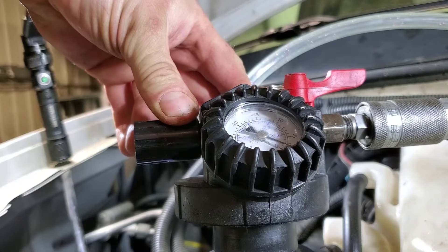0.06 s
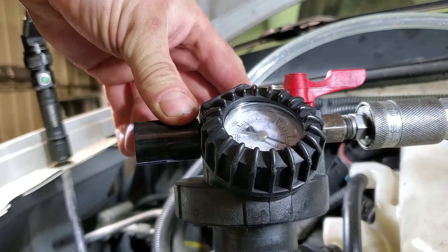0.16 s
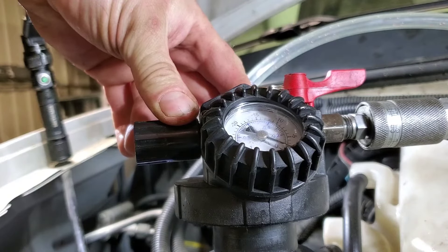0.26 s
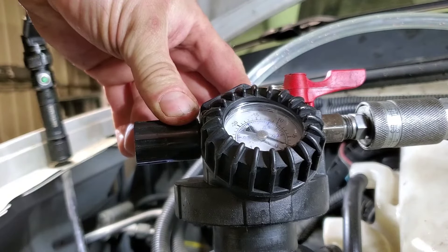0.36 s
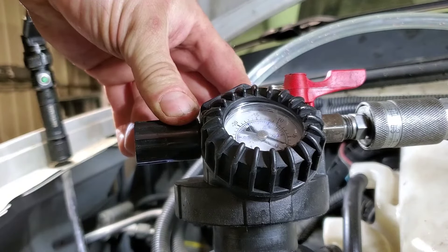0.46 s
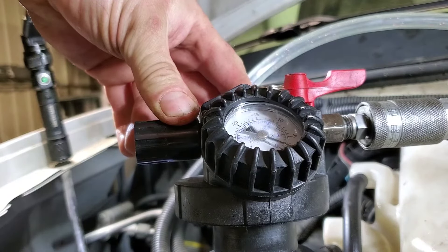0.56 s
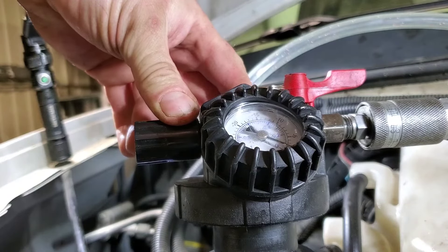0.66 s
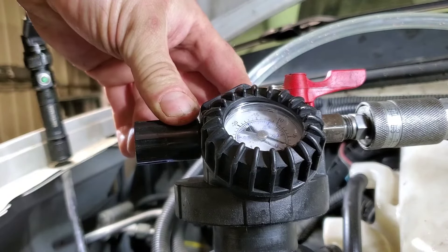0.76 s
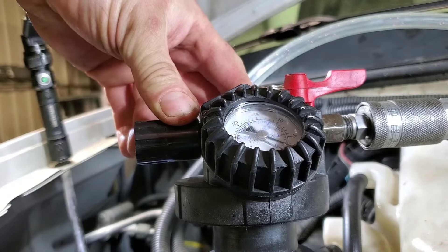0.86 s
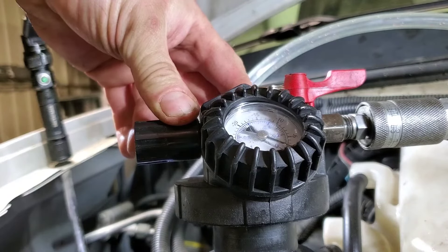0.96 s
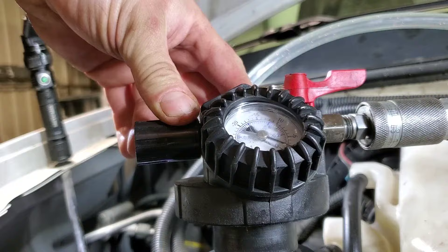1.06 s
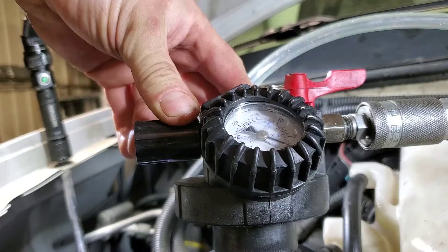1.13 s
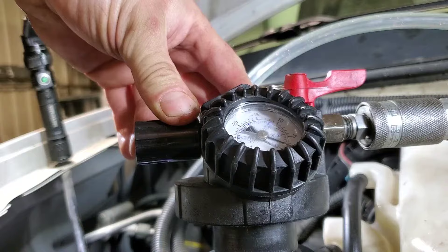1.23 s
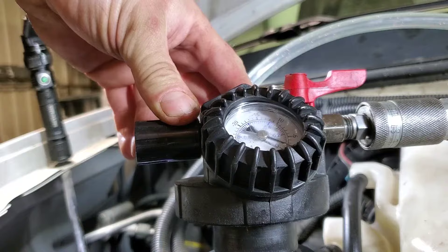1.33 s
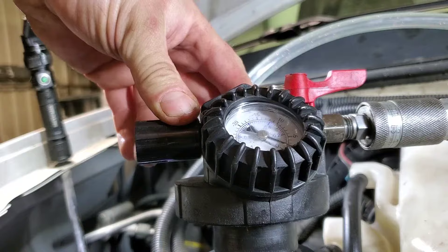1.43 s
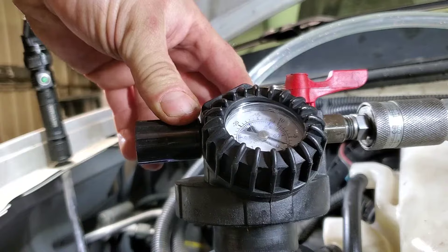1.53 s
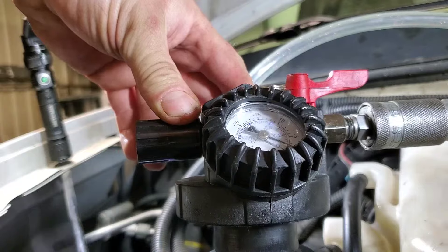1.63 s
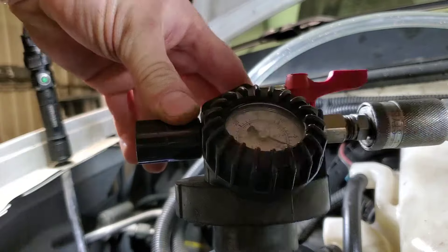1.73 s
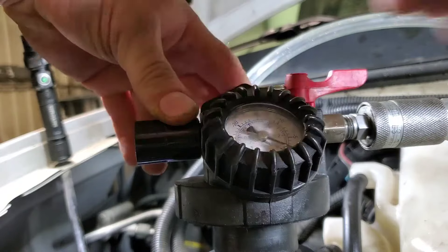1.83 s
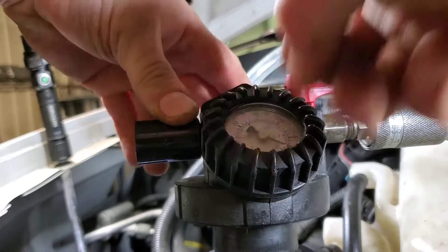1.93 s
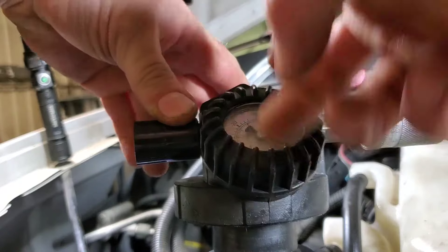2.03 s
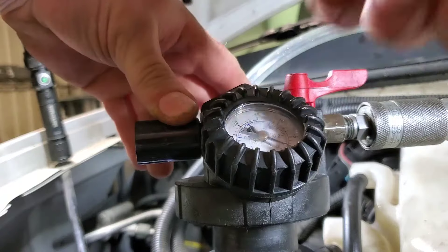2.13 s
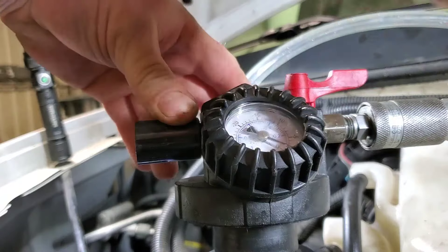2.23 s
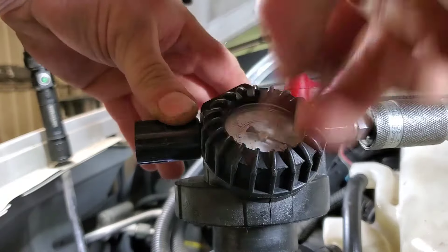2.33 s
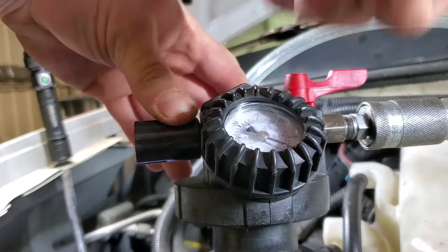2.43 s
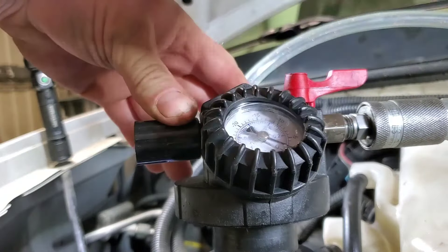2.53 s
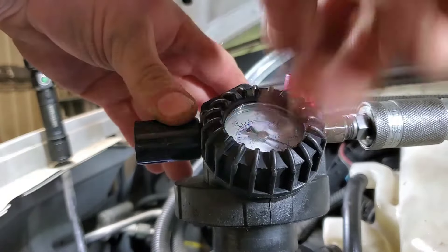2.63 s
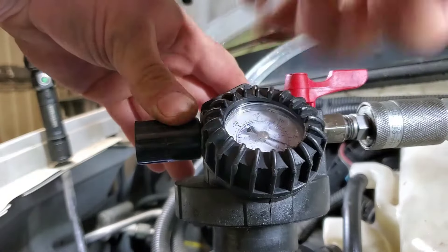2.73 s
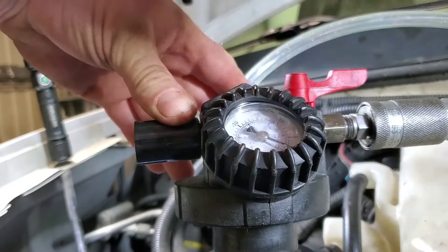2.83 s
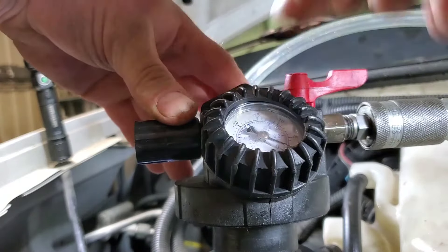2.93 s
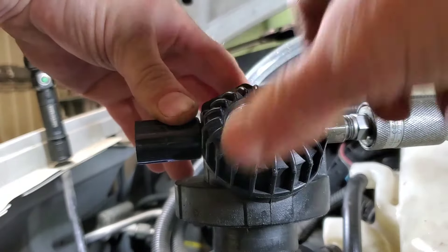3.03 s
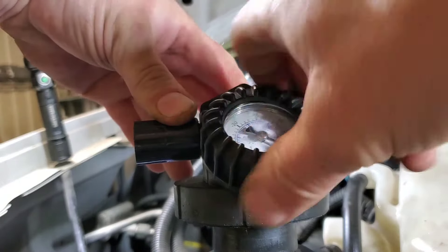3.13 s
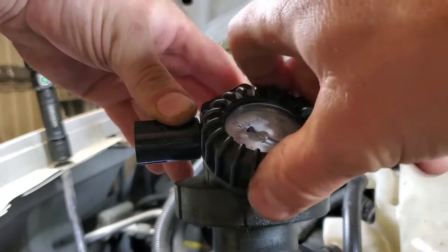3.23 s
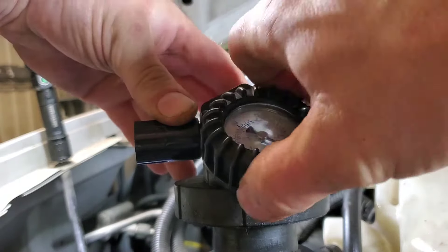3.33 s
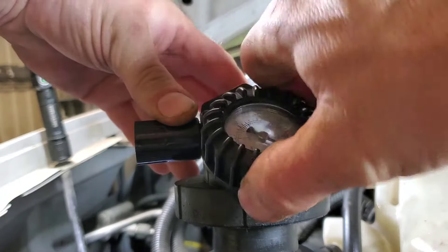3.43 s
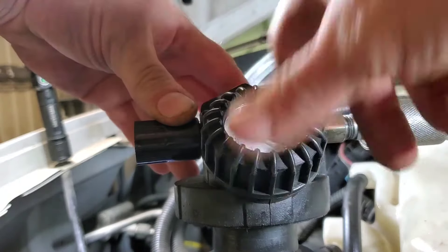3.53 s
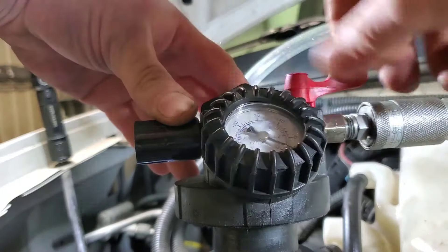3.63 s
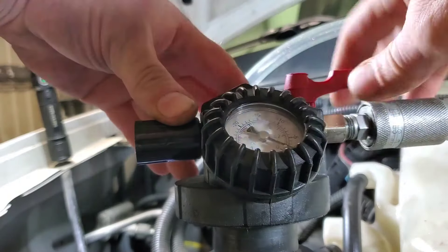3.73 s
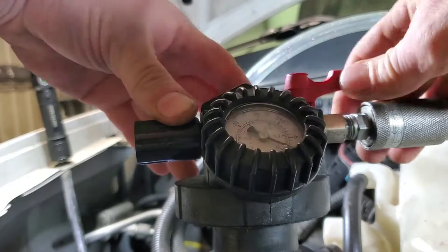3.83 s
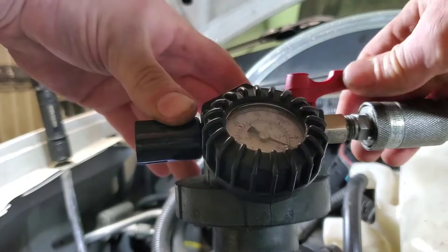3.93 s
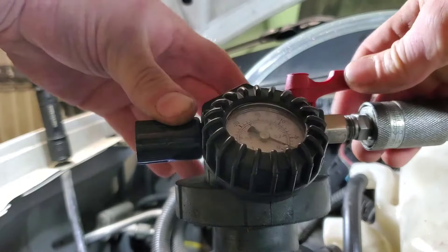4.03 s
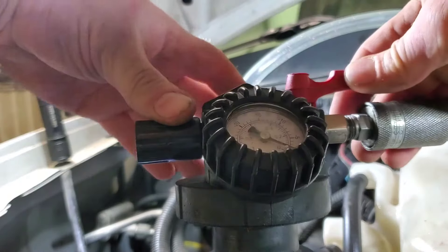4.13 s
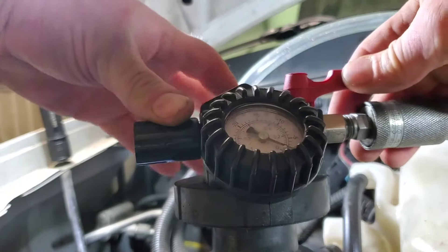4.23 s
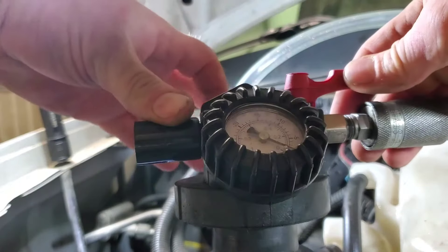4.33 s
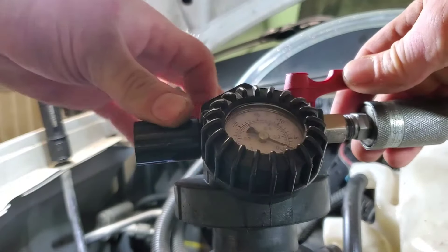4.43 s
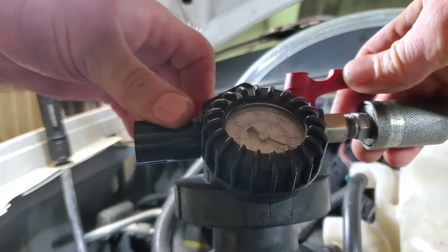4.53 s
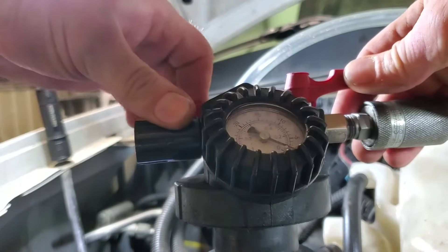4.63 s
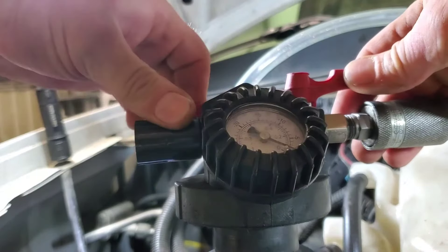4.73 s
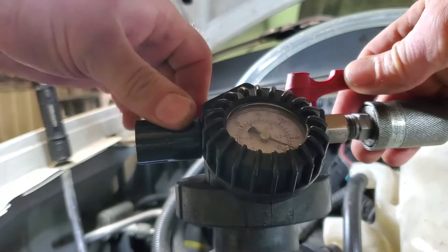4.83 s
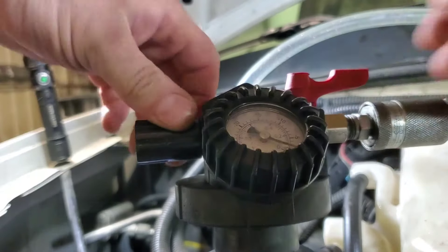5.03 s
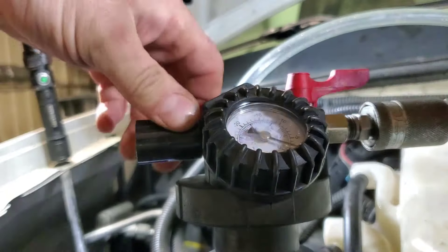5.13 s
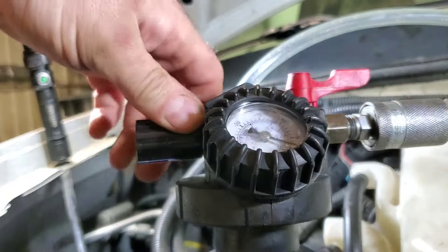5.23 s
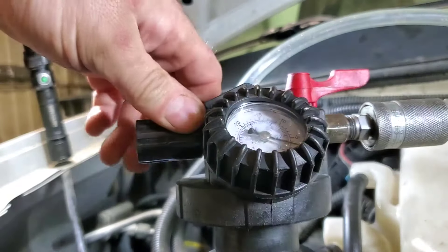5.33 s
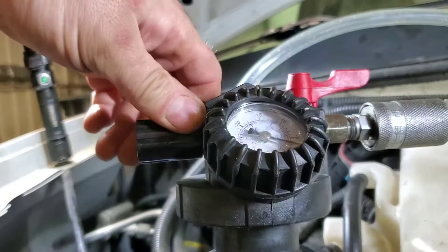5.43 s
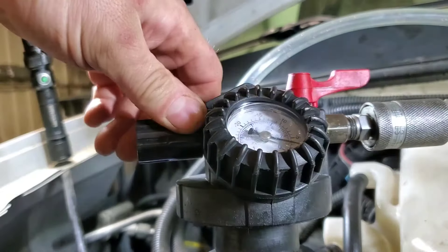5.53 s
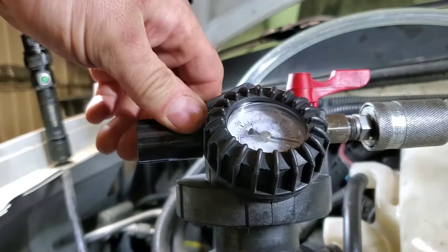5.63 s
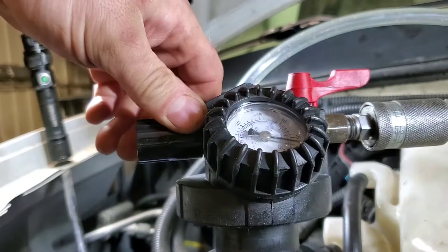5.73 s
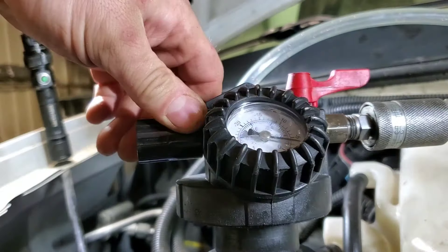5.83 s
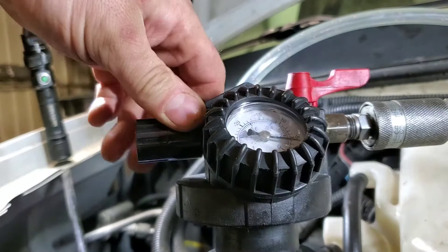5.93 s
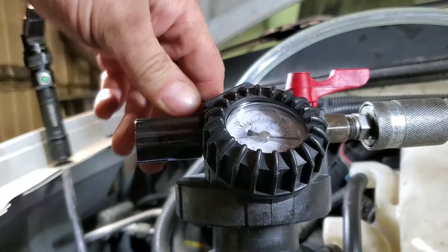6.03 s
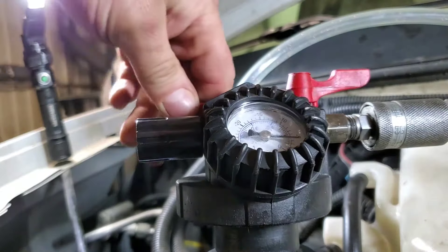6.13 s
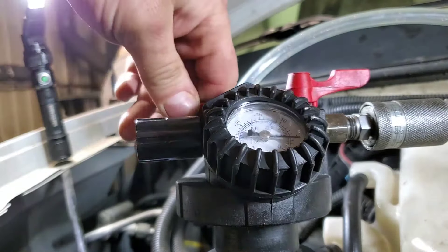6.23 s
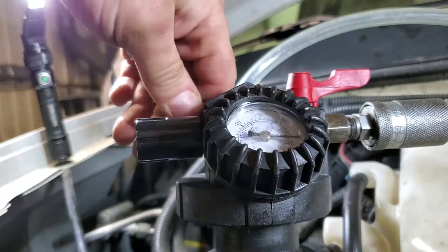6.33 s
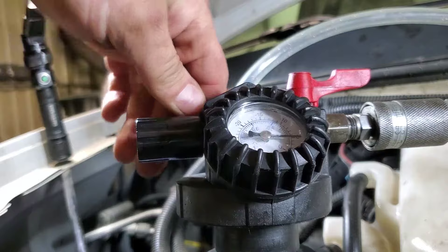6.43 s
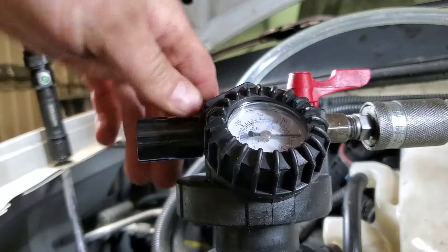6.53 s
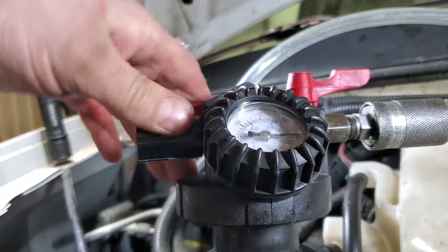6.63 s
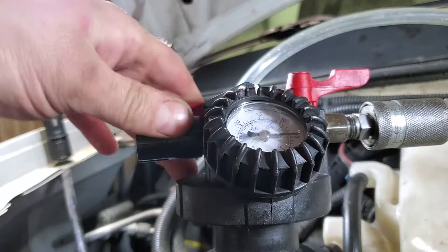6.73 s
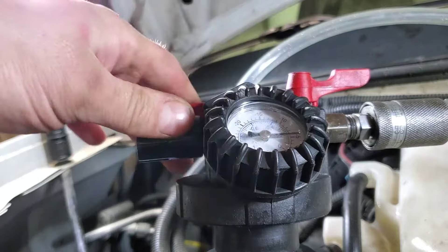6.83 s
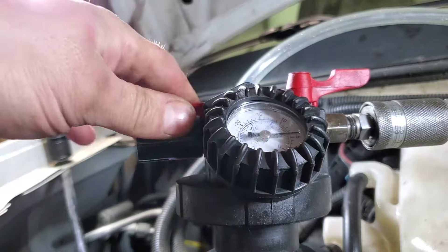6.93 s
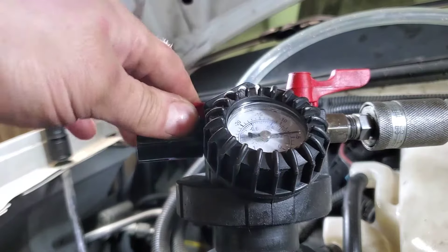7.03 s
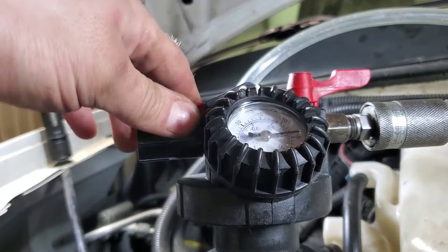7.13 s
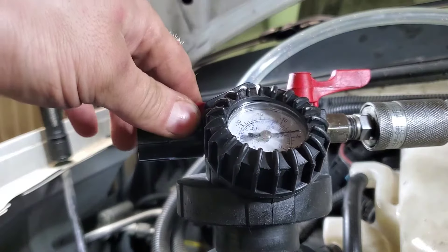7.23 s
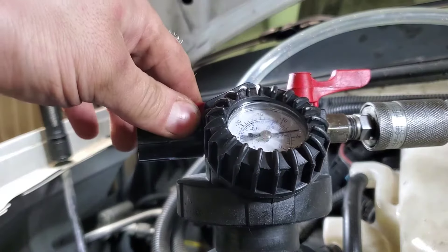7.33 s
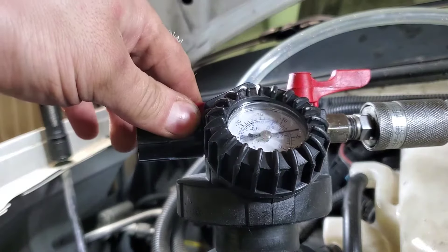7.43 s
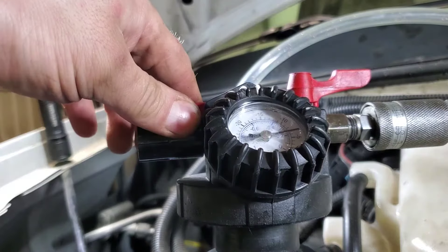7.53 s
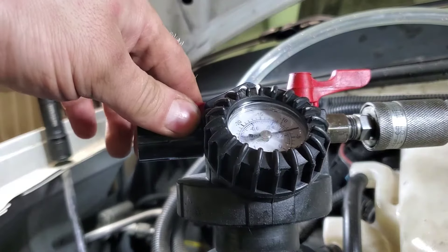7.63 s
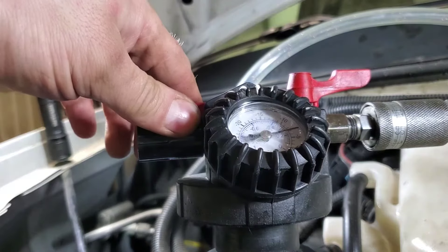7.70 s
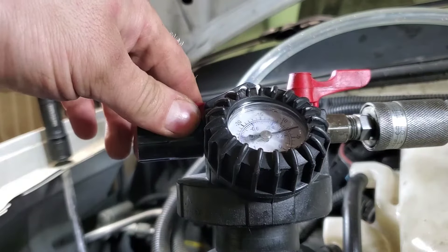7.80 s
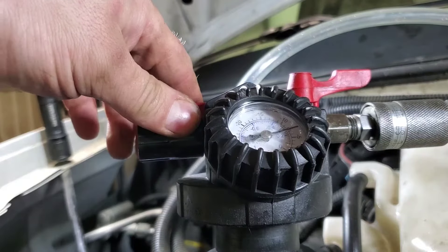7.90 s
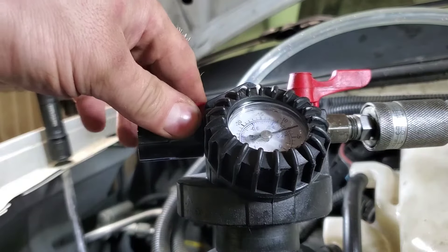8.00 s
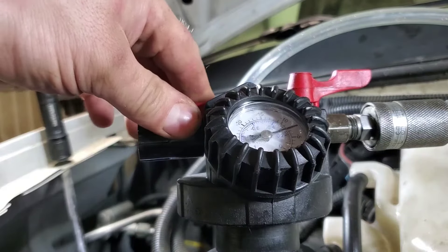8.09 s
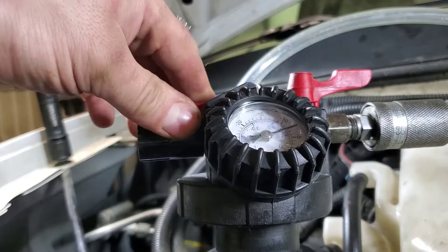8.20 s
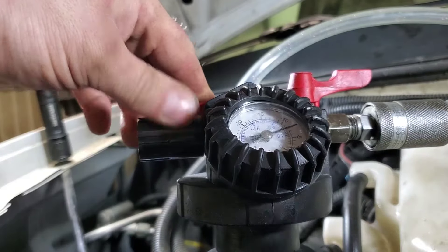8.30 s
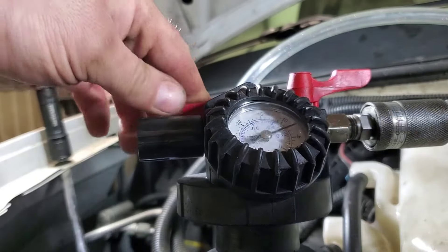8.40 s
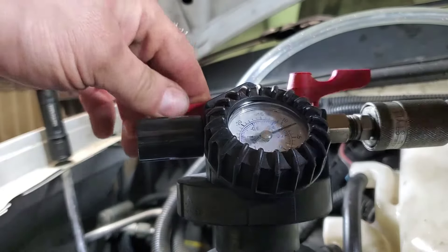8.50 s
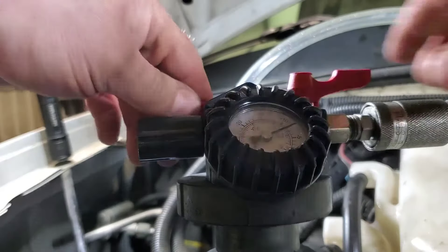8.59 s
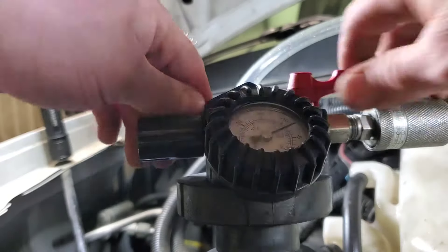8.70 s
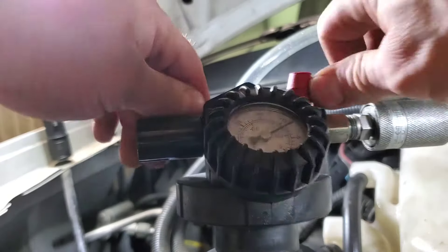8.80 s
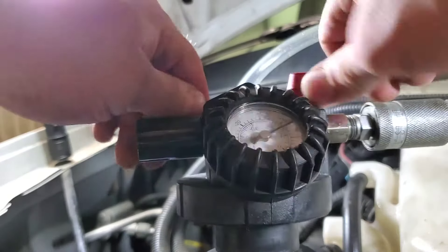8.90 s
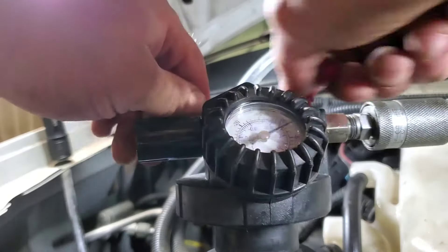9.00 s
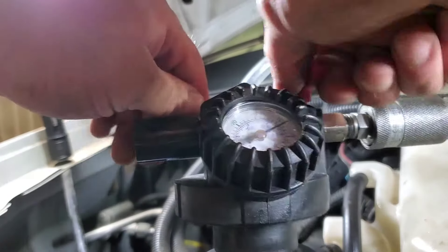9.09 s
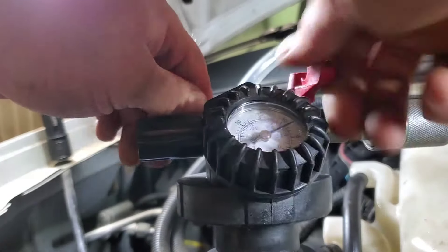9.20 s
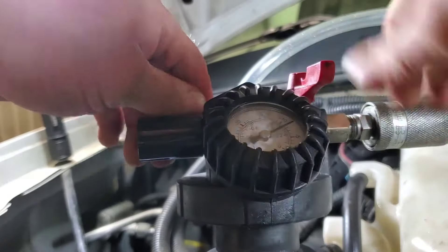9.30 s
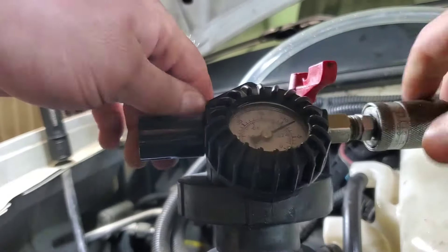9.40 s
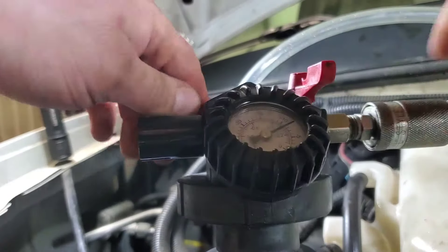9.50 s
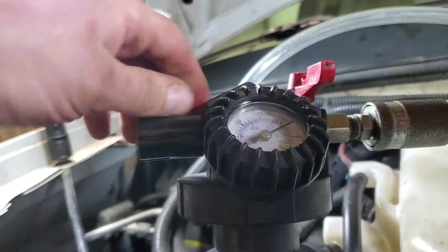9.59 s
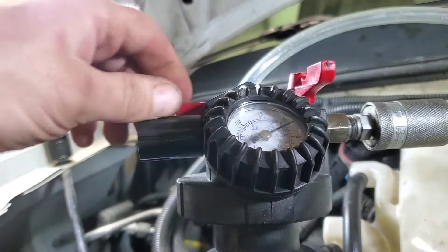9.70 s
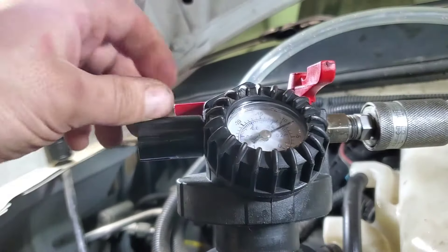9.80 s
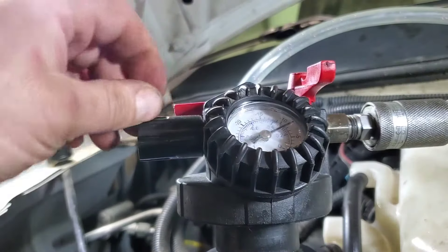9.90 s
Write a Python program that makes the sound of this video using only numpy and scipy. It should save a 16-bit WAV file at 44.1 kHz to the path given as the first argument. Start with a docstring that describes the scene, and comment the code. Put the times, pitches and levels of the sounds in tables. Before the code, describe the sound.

A dense, sharp air jet blows nonstop in a garage, heard close up with short reflections from the engine bay. Two light plastic-metal knocks tap early in the hiss. A cupping hand gradually reshapes its tone and screens the right microphone. Just after nine seconds the air is cut, falling quickly through a dull puff and click to quiet room tone.

```python
"""A steady, loud hiss comes first: compressed air through the venturi of a coolant vacuum filler.
It is noise, coloured by the hands round the outlet, and one hand screens the right microphone.
The tool, held over an engine bay in a garage, is knocked a few times: short pushes ring its modes.
Near 9 s the ball valve is shut: the jet dies with a last puff; filtered noise leaves a thin hiss and low room sound.
Faint blips and low puffs are swelling tones; the workshop behind is low noise and wavering hum."""
import sys
import numpy as np
from scipy import signal
from scipy.fft import rfft, irfft
from scipy.io import wavfile
from scipy.ndimage import map_coordinates

SR = 44100
rng = np.random.default_rng(int(sys.argv[2]) if len(sys.argv) > 2 else 0)


def unload_audio(sound):
    """Save the sound as a 16-bit wav file, at the path given as the first command line argument."""
    columns = np.transpose(np.atleast_2d(sound))
    # keep every value between -1 and 1, then stretch to whole-number steps
    steps = np.round(np.clip(columns, -1, 1) * 32767)
    wavfile.write(sys.argv[1], SR, steps.astype(np.int16))


N = 438794
TIME = np.arange(N) / SR  # s
FRAME = 1024  # samples in each short slice that is filtered on its own

# Broad colour of the jet at the two microphones:
# (frequency [Hz], left [dB], right [dB])
JET_COLOUR = [(1190, -10, -13), (2520, 0.36, -1.2), (5390, -4.5, -7.5), (8560, 3.67, 2.3),
              (11100.0, -0.84, -2.1), (14500, 11.5, 1)]
# Peaks and dips of the nozzle, hands and nearby parts:
# (frequency [Hz], width [Hz], left [dB], right [dB], added left by the cupped hand [dB],
#  added right by the cupped hand [dB], added by the hand at the valve [dB], phase of the right side [rad])
PEAKS_AND_DIPS = [(1956, 272, -0.2, -4.5, 18.5, 2.5, 4.5, -0.57),
                  (1937, 59, 6, 12.5, -7.5, -4.5, -8.5, 1.5), (2045, 51, -8, 1.7, 0.8, 6, 0, 1.3),
                  (2192, 133, 5.5, -0.5, -12, 0, -9, -0.14), (2560, 140, 0.1, 0.5, 0.4, -8, -3, -0.36),
                  (2856, 157, 7.0, 4.5, 0.2, -3, -9.5, -0.25), (3270, 57, 1.5, 4, -3, 1.5, -2, -0.04),
                  (3745.0, 275, 5.5, 2, -0.7, 1.3, -2.5, -1.1), (4053, 98, -5, -8.3, 12, 9, 7.5, -1.7),
                  (4314, 53, -1.5, 1.5, 5, -14, -7.5, 1.8), (4408, 142, 0.3, -1, 11, 8.9, 10.5, 1.2),
                  (4845, 234, 3, -1.3, 12.5, 3, -3, 0.0), (5370, 134, 1.2, -1, 3, -4, 11.5, 0.8),
                  (6000, 332.0, 9, 4.5, 2, -2.5, 4.5, -0.65), (6380, 126, 4.9, -0.5, 2.5, -2, -5, -0.3),
                  (6705.0, 200, -3, -7.5, 15.5, -1.2, 5, 2.5), (7180, 80, 4.5, -1, 3.5, -3.1, 1.5, 1.7),
                  (7525, 88, 10, 5.5, -11, -1.9, 6, 1.5), (7708, 238, -29, -24.5, 25, 10, -3, 2.1),
                  (8005, 114, -19, -28, 1, 4.1, -3, 0.2), (9150, 120, 3, -2, 3, -1, -2.5, 0),
                  (9760, 240, 5.5, 2, 0.1, -6, -0.5, -1.5), (10600, 330, 9, 4.5, 7.5, 1.5, 1, 2.06),
                  (11440, 226, 6.5, 6.5, 4.5, -2, -1.8, 0.3), (12630, 480, -6.2, -3, 6, -0.5, 3, 2.1),
                  (12800, 86, 6, 4.5, -1.6, 2, 0, -1), (13800, 274.0, -5.5, 0, 7.5, 3, -0.5, 0.4),
                  (14660, 370, -12, -6.3, 4.5, -6, -3, 1)]
# Shutting the valve: (time [s], flow [dB], tilt above 2 kHz [dB per octave])
VALVE = [(8.93, -1.5, -0.4735), (9.054, 2, -1.7), (9.068, -2, -6.5), (9.085, -15, -6), (9.104, -7.5, -7.5),
         (9.113, -12, -7.5), (9.121, -7, -10), (9.135, -32, -4), (9.2, -76, -4.5)]
# The left hand closes round the outlet, then closes further: (time [s], cupped [0-1])
CUP = [(0.0, 0.22), (1.8, 0.09), (2.1, 0.14), (3.6, 0.0), (4.1, 0), (4.5, 0.0), (4.72, 0.45), (5.3, 0.47),
       (6.1, 0.6), (6.5, 0.82), (6.8, 0.76), (7.3, 0.98), (8.3, 0.99), (8.6, 0.8), (9.0, 0.87)]
# The gap between its fingers makes one gliding peak or dip: (time [s], frequency [Hz], height [dB])
FINGER_GAP = [(0.0, 3230, 5.3), (2.0, 3260, 3.5), (3.4, 3240, 3.5), (4.4, 2983.0, 5.5), (4.9, 3270, 3.5),
              (5.8, 3660, 8), (6.5, 3401.0, 7), (6.8, 3820, -1), (7.1, 4573.0, -7), (7.5, 4600, -3.5),
              (7.9, 4320, -2.5), (8.3, 4170, -4), (8.56, 3597.0, 8), (9.0, 3820, -0.2)]
# The reflection off the palm makes a higher one: (time [s], frequency [Hz], height [dB])
PALM_ECHO = [(0.0, 4200, -5.4), (1.8, 4150, -6.5), (2.4, 4750, 0), (2.7, 4887.0, -8), (3.6, 4500, -1.1),
             (4.45, 4897.0, -5), (4.7, 4800, 3), (5.2, 5100, -0.5), (5.6, 4700.0, -5), (6.2, 4675.0, 0.48),
             (6.6, 4500, -1), (6.9, 4460, -3.5), (7.2, 5870, 4), (7.8, 5781.0, 2.5), (8.3, 5100, -1.9),
             (8.55, 5220.0, 7), (9.0, 5400, -5)]
# A narrow dip, now and then a peak, wanders below them as the grip changes:
# (time [s], frequency [Hz], height [dB])
GRIP_DIP = [(0.0, 2034.0, -2.9), (2.2, 2106.0, -1.5), (3.6, 2000, -2.8), (4.4, 2090, -2.5),
            (4.9, 2304.0, -8), (5.3, 2561.0, -5.5), (6.0, 2560, -9), (6.4, 2870, 3), (6.7, 3072.0, -3.5),
            (7.0, 3268.0, 5), (8.2, 2900, -5), (8.65, 2281.0, -5), (9.0, 2838.0, -7)]
# A hand comes near the tool and draws back: (time of the turn [s], half-length [s], nearness [0-1])
REACHES = [(1.859, 0.079, 0.4), (2.107, 0.08, 0.0), (2.98, 0.098, 0.53), (4.37, 0.5, 0.87),
           (6.704, 0.076, 0.7), (8.688, 0.19, 0.605)]
# A hand moves in front of the right microphone, stays and lifts a little: (time [s], level [dB])
HAND_SCREEN = [(6.14, -0.5), (6.21, -9), (8.65, -9.5), (8.97, -6.5)]
# A finger shifts at the outlet and shades or bares the jet:
# (time at the middle [s], half-length [s], level [dB])
FINGER_SHIFTS = [(2.11, .06, 0.5), (3.5, .3, .5), (5.755, 0.58, -0.8), (6.687, .035, 1),
                 (7.075, .061, -1.3), (8.04, .062, 1.5), (8.61, .038, -2.5), (8.777, .029, 1.3)]
# Thin hiss left after the valve is shut, with some low sound of the room:
# (frequency [Hz], left [dB per Hz], right [dB per Hz])
LEFTOVER_HISS = [(150, -105, -105), (280, -85, -87), (480, -93, -101), (750, -94, -102), (1100, -96, -107),
                 (1500, -106, -118), (2400, -98, -113), (3200, -89, -104), (5300, -91, -107),
                 (6350, -86, -103), (7600, -99, -110), (8600, -92, -101), (10200, -91, -94),
                 (11000, -85, -94), (12400, -88, -90), (14500, -89, -98)]
# Knocks on the tool, before reflections and balance:
# (time [s], peak [dB], rattle half-length [s], centre of its modes [Hz], spread [octaves], fall by 60 dB [s])
KNOCKS = [(2.443, -27.5, 0.011, 430, 0.83, 0.042), (2.775, -21.5, .002, 1500, 1, .025),
          (2.783, -32, 0.0086, 380, 0.7, .035), (8.555, -47, .004, 170, 0.36, .06),
          (9.119, -26, 0.0012, 2600, 3, 0.0073)]
# What the tool rings with: (frequency [Hz], relative level [dB])
TOOL_MODES = [(180, -8), (323, 8), (455, 3.5), (641, 3), (740, -1), (980, -20), (1265, 6.5), (1453, 1),
              (1900, -6), (2450, -7), (3200, -7), (4100, -8)]
# Faint hollow blips under the hiss: (time [s], frequency [Hz], peak on the left [dB])
BLIPS = [(0.718, 905, -49), (0.765, 830, -51), (0.822, 800, -50), (1.828, 820, -46), (2.503, 790, -48),
         (4.15, 783, -49), (4.342, 810, -44), (4.576, 780, -50), (4.932, 923, -50), (5.236, 830, -48),
         (5.41, 760, -51), (7.456, 830, -58), (8.54, 457, -45), (8.543, 737, -46), (8.566, 974, -46),
         (8.567, 1163, -48), (8.99, 834, -54), (9.066, 810, -50)]
# Low puffs, before random scatter: (time [s], peak [dB])
PUFF_LEVEL = [(0, -49.5), (6.1, -52.5), (6.3, -58.5), (9, -57)]
# Low rumble of the workshop, before its gaps; the balance also moves the hum:
# (time [s], level [dB], left minus right [dB])
RUMBLE_LEVEL = [(0, -49.5, -3), (2.0, -49, -2), (2.7, -53.5, -6), (6.1, -52, -4.5), (6.3, -64.5, -13),
                (8.8, -64.5, -13), (9.15, -54, 3), (9.95, -57, 3)]
# Colour of the rumble: (frequency [Hz], relative level [dB])
RUMBLE_COLOUR = [(20, -45), (40, -18), (60, -4), (95, 10), (130, 7), (175, 4.5), (225, -4.5), (290, -8),
                 (340, -40), (420, -48), (1000, -35)]
# Hum of workshop machines, before wavering, gaps and balance: (frequency [Hz], level [dB])
HUM = [(59.5, -74), (118.6, -65.5), (172.3, -67.5), (258.4, -63)]
# How rarely the low sounds come through between gaps: (frequency [Hz], threshold [spreads of the chance])
LUMPS = [(50, .1), (120, -0.56), (190, .1), (260, 1.87), (350, 2.5), (450, 0)]


def jet(level_db=-57.5, surge_db=0.88, flutter_db=0.75, lowest_hz=1270, drift_db=2.54, treble_drift_db=2.34):
    """Turbulent air from the nozzle; it grows weak and dull as the valve takes the pressure away."""
    flow_db, _ = curves(VALVE, TIME)
    air = turbulence(shared=0.67)
    air = air * undb(level_db + flow_db + surge_db * walk(14) + flutter_db * walk(150))
    air = surroundings(air, bay_db=-15, bay_t60=0.057, garage_db=-20, garage_t60=0.56)

    overlap = FRAME - FRAME // 4
    hz, s, frames = signal.stft(air, SR, nperseg=FRAME, noverlap=overlap)
    _, tilt = curves(VALVE, s)
    octaves_above_2k = np.log2(np.maximum(hz / 2000, 1))
    # the colour of the hiss wanders at random over frequency and time
    depth_db = np.interp(hz, [5000, 9000], [drift_db, treble_drift_db])[:, None]
    wander_db = depth_db * drift(hz, s, spacing_hz=95, rate=4.5)
    shade = undb(np.outer(octaves_above_2k, tilt) + wander_db)
    frames = frames * outlet_colour(hz, s) * shade
    sound = signal.istft(frames, SR, nperseg=FRAME, noverlap=overlap)[1][:, :N]

    # the hiss is thin: almost nothing is heard below about 1.3 kHz
    low_cut = signal.cheby1(12, 0.5, lowest_hz, "high", fs=SR, output="sos")
    return signal.sosfilt(low_cut, sound)


def turbulence(shared):
    """Rushing air is noise: each microphone hears partly the same eddies and partly its own."""
    return np.sqrt(shared) * white(channels=1) + np.sqrt(1 - shared) * white()


def outlet_colour(hz, s, cup_left_db=-4.5, cup_right_db=0.5, reach_rest=0.17, port_lag_ms=0.1646):
    """Reflections past the hands lift and cut frequencies: complex gain (side, frequency, time)."""
    cup, = curves(CUP, s)
    screen_db, = curves(HAND_SCREEN, s)
    # between the reaches the nearness is reach_rest
    reach = reach_rest + sum((near - reach_rest) * bell(s, when, span) for when, span, near in REACHES)
    finger_db = sum(db * bell(s, when, span) for when, span, db in FINGER_SHIFTS)
    (centre, width, left_peak, right_peak, left_cup, right_cup,
     reach_peak, phase) = np.transpose(PEAKS_AND_DIPS)
    humps = bell(hz[:, None], centre, width)

    # the cupped palm is a small cavity; fingers and palm add gliding peaks and dips
    left_glides, right_glides = (glide(FINGER_GAP, hz, s, width_hz=313, right_share=0.15)
                                 + glide(PALM_ECHO, hz, s, width_hz=170, right_share=1.5)
                                 + glide(GRIP_DIP, hz, s, width_hz=114, right_share=1))
    left_palm = np.outer(cup_left_db + humps @ left_cup, cup) + left_glides
    right_palm = np.outer(cup_right_db + humps @ right_cup, cup) + right_glides

    both = finger_db + np.outer(humps @ reach_peak, reach)
    left_jet, right_jet = spectra(JET_COLOUR, hz)
    left = (left_jet + humps @ left_peak)[:, None] + both + left_palm
    right = (right_jet + humps @ right_peak)[:, None] + both + right_palm + screen_db
    # the outlet points left, so the right microphone hears it later
    turn = humps @ phase - 2 * np.pi * hz * port_lag_ms / 1000
    return np.array([undb(left), undb(right) * np.exp(1j * turn)[:, None]])


def glide(table, hz, s, width_hz, right_share):
    """A peak or dip that moves with the hand: dB (side, frequency, time)."""
    centre_hz, db = curves(table, s)
    hump = db * bell(hz[:, None], centre_hz, width_hz)
    return np.array([hump, right_share * hump])


def leftover_hiss(start_s=9.06, rise_s=0.016):
    """Thin hiss left after the valve is shut, with some low sound of the room: noise through a spectrum."""
    air = surroundings(turbulence(shared=0.35), bay_db=-5.5, bay_t60=0.031, garage_db=-6, garage_t60=0.65)
    fade_in = np.clip((TIME - start_s) / rise_s, 0, 1)
    return coloured(air, LEFTOVER_HISS) * fade_in


def knocks(rattle=0.068, left_db=2):
    """The loose tool rubs in the filler neck and strikes; where it strikes decides which modes ring most."""
    out, t = np.zeros(N), TIME[:SR // 4]
    hz, mode_db = np.transpose(TOOL_MODES)
    modes = undb(mode_db)[:, None] * np.cos(2 * np.pi * np.outer(hz, t))
    lead = SR // 20  # room for the rattle that comes before the strike
    for s, db, rattle_s, centre_hz, octaves, t60 in KNOCKS:
        push = rattle * rng.standard_normal(len(t)) * bell(t, t[lead], rattle_s)
        push[lead] += 1  # the strike itself
        mode_share = bell(np.log2(hz / centre_hz), 0, octaves)
        ring = mode_share @ modes * decay(t, t60)
        knock = signal.fftconvolve(push, ring)[:len(t)]
        start = int(s * SR) - lead
        out[start:start + len(t)] += undb(db) * knock / np.abs(knock).max()
    heard = surroundings(out, bay_db=0.5, bay_t60=0.033, garage_db=-35, garage_t60=0.21)
    return heard * undb([[left_db], [0]])


def blips(half_length_s=0.01, right_db=-5):
    """Faint hollow tones that swell and vanish under the hiss."""
    tones = sum(undb(db) * bell(TIME, s, half_length_s) * np.sin(2 * np.pi * hz * TIME)
                for s, hz, db in BLIPS)
    return tones * undb([[0], [right_db]])


def burble(count=46, low_hz=205, high_hz=290, half_length_s=0.011, scatter_db=3):
    """Soft low puffs, short swelling tones at random moments while the air is blowing."""
    out = np.zeros(N)
    last_s = PUFF_LEVEL[-1][0]
    for when, pitch, size in rng.random((count, 3)):
        s = when * last_s
        hz = low_hz + pitch * (high_hz - low_hz)
        level_db, = curves(PUFF_LEVEL, s)
        puff_db = level_db + scatter_db * (2 * size - 1.5)
        near = np.abs(TIME - s) < 0.1
        t = TIME[near]
        out[near] += undb(puff_db) * bell(t, s, half_length_s) * np.sin(2 * np.pi * hz * t)
    return out


def workshop(side=0.84, waver_db=1, waver_rad=0.32, gap_db=55):
    """A diffuse low rumble and wavering machine hum; both come in uneven lumps while the air is blowing."""
    mid, apart = coloured(white(), RUMBLE_COLOUR)
    level_db, balance_db = curves(RUMBLE_LEVEL, TIME)
    sides = np.array([[1], [-1]])
    rumble = undb(level_db) * (mid + side * sides * apart) / mid.std()
    hum = np.zeros(N)
    for tone_hz, db in HUM:
        loudness = np.sqrt(2) * undb(db + waver_db * walk(2.41))
        hum += loudness * np.sin(2 * np.pi * tone_hz * TIME + waver_rad * walk(7.7))

    hz, s, frames = signal.stft(rumble + hum, SR, nperseg=FRAME)
    flow_db, _ = curves(VALVE, s)
    # the gaps between the lumps are most frequent at the upper edge of the rumble
    threshold, = curves(LUMPS, hz)
    gaps = np.clip(drift(hz, s, spacing_hz=80, rate=19) - threshold[:, None], -2, 0)
    # the gaps fill up as the flow dies
    frames = frames * undb(gap_db * gaps * undb(flow_db))
    low = signal.istft(frames, SR, nperseg=FRAME)[1][:, :N]
    return low * undb(sides * balance_db / 2)


def surroundings(x, bay_db, bay_t60, garage_db, garage_t60):
    """Direct sound, dense quick engine-bay reflections and a garage tail, at two microphones."""
    t = TIME[:SR // 2]
    response = np.zeros((2, len(t)))
    response[:, 0] = 1  # direct sound
    for db, t60 in ((bay_db, bay_t60), (garage_db, garage_t60)):
        tail = rng.standard_normal(response.shape) * decay(t, t60) * (t > 0.003)
        response += undb(db) * tail / np.linalg.norm(tail, axis=1, keepdims=True)
    response /= np.linalg.norm(response, axis=1, keepdims=True)
    return signal.fftconvolve(np.atleast_2d(x), response, axes=1)[:, :N]


def white(channels=2):
    """White noise of 0 dB per Hz."""
    return rng.standard_normal((channels, N)) * np.sqrt(SR / 2)


def coloured(x, table):
    """Sound filtered by a spectrum."""
    gain = undb(spectra(table, np.fft.rfftfreq(N, 1 / SR)))
    return irfft(rfft(x) * gain, N)


def walk(rate):
    """Random values joined by straight lines, of spread near 1, with `rate` values a second."""
    knots = rng.standard_normal(int(rate * N / SR) + 2)
    return np.interp(TIME * rate, np.arange(len(knots)), knots)


def drift(hz, s, spacing_hz, rate):
    """Smooth chance over frequency and time, of spread near 1."""
    rows, columns = np.meshgrid(hz / spacing_hz, s * rate, indexing="ij")
    knots = rng.standard_normal((256, 256))
    return map_coordinates(knots, [rows, columns], order=2, mode="mirror")


def decay(t, t60):
    """Dying away by 60 dB in t60 seconds."""
    return np.exp(-np.log(1000) * t / t60)


def bell(x, centre, width):
    """A rounded hump of height 1."""
    return np.exp(-0.5 * ((x - centre) / width) ** 2)


def undb(db):
    """Decibels to gain."""
    return 10 ** (np.asarray(db) / 20)


def curves(table, at):
    """Each later column of a table, joined by straight lines along the first."""
    points, *columns = np.transpose(table)
    return [np.interp(at, points, column) for column in columns]


def spectra(table, hz):
    """Each dB column of a spectrum, joined on a log-frequency axis."""
    points, *columns = np.transpose(table)
    return np.array([np.interp(np.log(hz + 1), np.log(points), column) for column in columns])


def scene():
    """The jet, the thin hiss that follows it, knocks, faint blips, low puffs and the workshop."""
    return jet() + leftover_hiss() + knocks() + blips() + burble() + workshop()


def record(dry, top_hz=14500):
    """The recorder cuts the top steeply."""
    top_cut = signal.ellip(12, 0.2, 90, top_hz, fs=SR, output="sos")
    return signal.sosfilt(top_cut, dry)


dry = scene()
out = record(dry)
unload_audio(out)
```